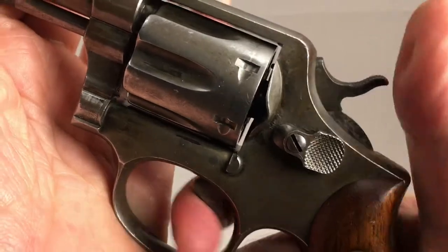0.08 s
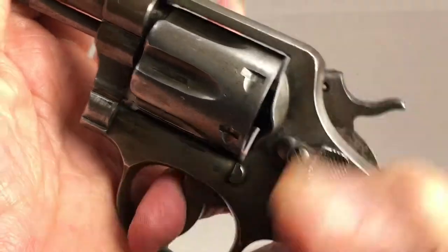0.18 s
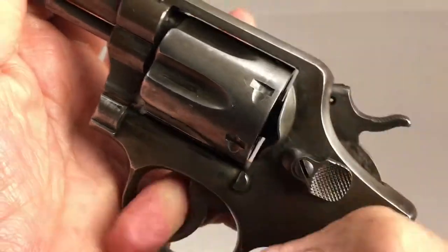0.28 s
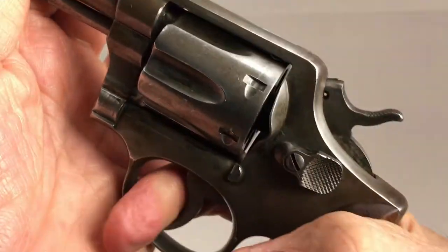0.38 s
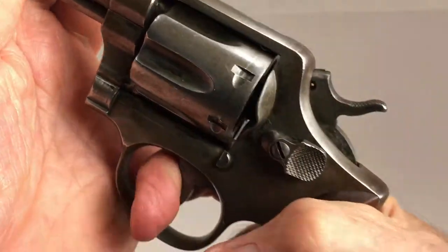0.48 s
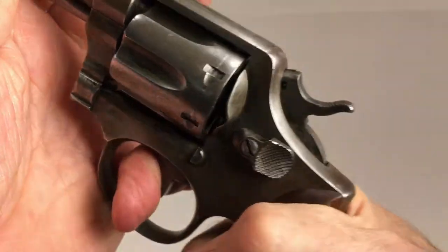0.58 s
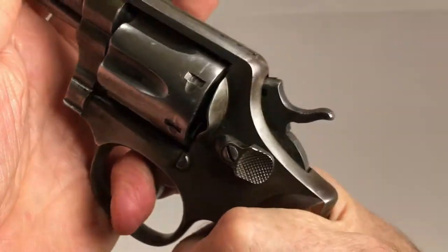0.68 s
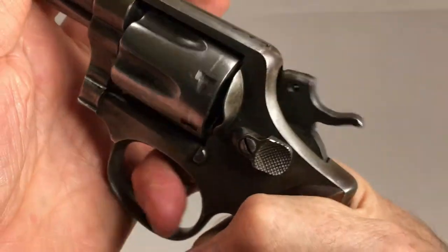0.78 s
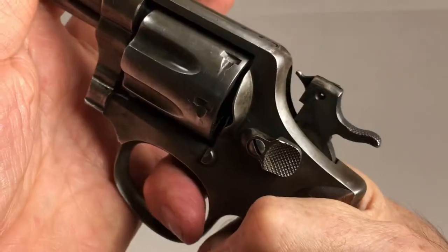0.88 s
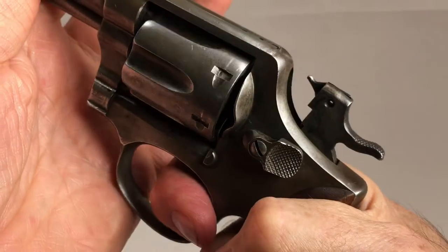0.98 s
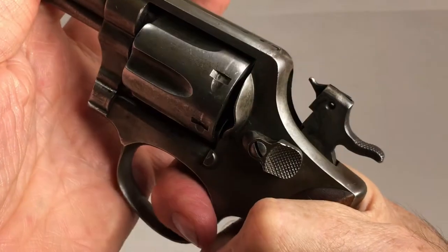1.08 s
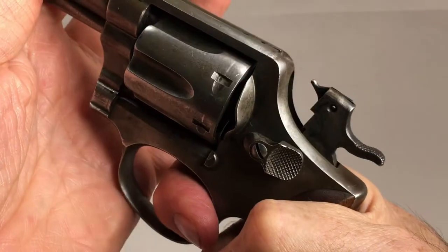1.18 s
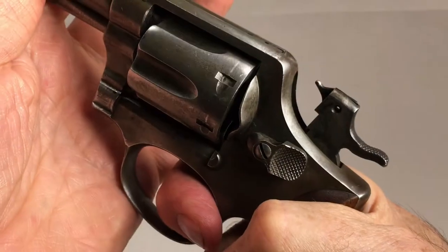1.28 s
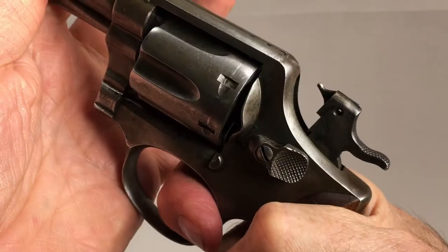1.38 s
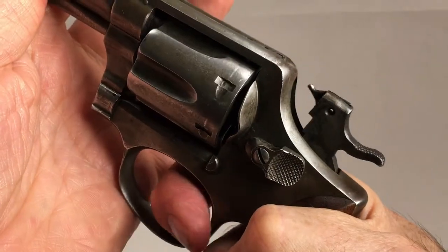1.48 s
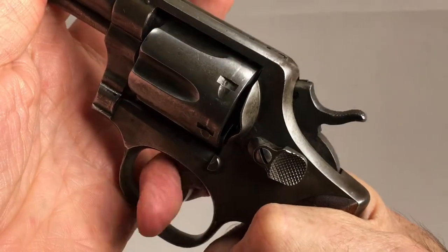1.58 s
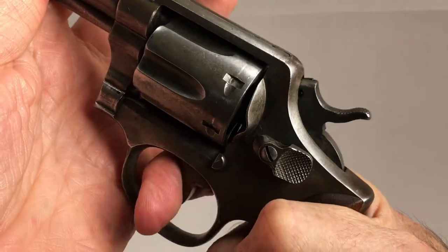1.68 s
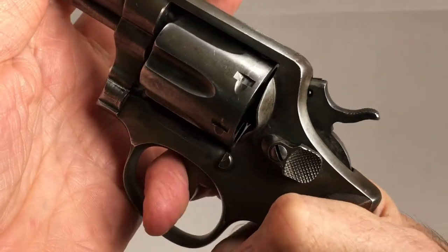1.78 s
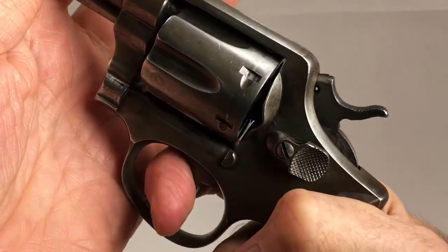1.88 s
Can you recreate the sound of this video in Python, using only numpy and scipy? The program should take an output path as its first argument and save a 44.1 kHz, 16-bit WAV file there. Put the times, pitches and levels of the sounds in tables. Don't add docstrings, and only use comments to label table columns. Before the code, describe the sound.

A revolver is worked by hand close to a small microphone: a light latch click and hard spring snap, then the cylinder stop, the hammer cocking, a pause, and a loud hammer fall in a quiet furnished room.

```python
import sys
import numpy as np
from scipy import signal
from scipy.fft import rfft, irfft
from scipy.io import wavfile

SR = 44100
rng = np.random.default_rng(int(sys.argv[2]) if len(sys.argv) > 2 else 0)


def invert_db(level):
    return 10 ** (np.asarray(level, dtype=float) / 20)


def log_audio(samples):
    frames = np.atleast_2d(samples).T
    limited = np.clip(frames, -1, 1)
    pcm = np.round(limited * 32767).astype(np.int16)
    wavfile.write(sys.argv[1], SR, pcm)


N = 85995


def evened(x):
    return x / np.sqrt(np.mean(x ** 2) + 1e-20)


def read(points, hz):
    point_hz, value = np.transpose(points)
    return np.interp(np.log(hz + 1), np.log(point_hz + 1), value)


def add(mix, start_s, sound):
    part = mix[round(start_s * SR):][:len(sound)]
    part += sound[:len(part)]


def shaped(gain):
    spectrum = rfft(rng.standard_normal(N))
    return evened(irfft(spectrum * gain(np.fft.rfftfreq(N, 1 / SR)), N))


def bunch(hz, width, count):
    return np.repeat(hz, count) + np.repeat(width, count) * rng.uniform(-1, 1, len(hz) * count)


def ring(hz, db, t60, length, rise_s=.0001):
    t = np.arange(length) / SR
    phase = 2 * np.pi * (hz[:, None] * t + rng.random((len(hz), 1)))
    decay = invert_db(db[:, None] - 60 * t / t60[:, None])
    return (decay * np.sin(phase)).sum(0) * np.minimum(t / rise_s, 1)


# pitch_hz, level_db
HUM_SPECTRUM = [(15, -11), (25, 6), (86, -12.5), (123, -3.5), (200, -5), (290, -18), (430, -25),
                (694, -25.5), (1500, -27.5), (1950, -67), (3300, -120)]
# pitch_hz, level_db
HISS_SPECTRUM = [(410, -31.5), (700, -11.5), (1170, -8), (1250, -10), (2240, -10.5), (4860, -13),
                 (12600, -18), (16000, -27.5)]
# start_s, level_db
HISS_GATE = [(0, -2.5), (0.129, -2.5), (.3, -3), (0.669, -4.5), (.72, -10.5), (0.798, -10), (.9, -6),
             (.92, -3.5), (1.199, -4), (1.481, -3.5), (1.488, -14), (1.604, -14), (1.643, 0), (1.7, -5.5),
             (1.95, -3)]
HUM_DB, HISS_DB = -52.5, -60


def floor():
    def hum_gain(hz):
        return invert_db(read(HUM_SPECTRUM, hz)) / (1 + (42 / (hz + 1)) ** 8) / (1 + (hz / 900) ** 6)

    def hiss_gain(hz):
        return invert_db(read(HISS_SPECTRUM, hz)) / (1 + (600 / (hz + 1)) ** 6) * (hz < 15800)

    gate_db = np.interp(np.arange(N) / SR, *np.transpose(HISS_GATE))
    return invert_db(HUM_DB) * shaped(hum_gain) + invert_db(HISS_DB + gate_db) * shaped(hiss_gain)


# pitch_hz, t60_s
ROOM_DECAY = [(1000, 0.36), (2500, 0.31), (5000, 0.35), (9000, 0.22), (15000, 0.074)]


def room(x):
    taps = np.zeros(SR // 2)
    at = np.arange(120, len(taps) - 20, 20)
    taps[at + rng.integers(0, 20, len(at))] = rng.choice([-1., 1.], len(at))
    hz, t, bands = signal.stft(taps, SR, nperseg=128)
    absorbed = bands * invert_db(-60 * t / read(ROOM_DECAY, hz)[:, None])
    tail = signal.istft(absorbed, SR, nperseg=128)[1]
    return signal.fftconvolve(x, tail / np.linalg.norm(tail))[:N]


# start_s, length_s, level_db, pitch_hz, width_hz
RUBS = [
    (.62, .065, -67, 6400, 1300),
    (1.06, .025, -52, 3080, 100),
    (.485, .09, -40.5, 54, 9),
    (.475, .09, -59, 450, 600),
    (1.642, .025, -47, 380, 40),
    (.86, .045, -50, 55, 15),
    (.74, .04, -69, 1500, 600),
]


def rubs():
    out = np.zeros(N)
    for start_s, length_s, level_db, pitch_hz, width_hz in RUBS:
        size = round(length_s * SR)
        noise = shaped(lambda f: np.exp(-((f - pitch_hz) / width_hz) ** 2))
        add(out, start_s, invert_db(level_db) * np.hanning(size) ** .5 * evened(noise[:size]))
    return out


# start_s, peak_db, centre_hz, t60_s
TICKS = [(0.1736, -25.5, 7860, 0.016), (.1782, -29.5, 6800, 0.033), (0.189, -34.5, 4600, 0.04),
         (0.1956, -29, 4980, 0.052), (0.2001, -20.5, 7200, 0.017), (0.7009, -25, 5560, 0.012),
         (.7020, -40.5, 4560, 0.032), (0.799, -48, 2100, .015), (0.8269, -45, 5010, .02),
         (0.8337, -32.5, 6040, 0.018), (0.8327, -38, 2800, 0.047), (0.8483, -36, 8950, 0.012),
         (0.8824, -45, 9170, 0.0093), (1.0090, -43, 6760, 0.023), (1.5117, -54, 8000, .02),
         (1.5665, -44.5, 4915, 0.026), (1.5865, -44.5, 4000, 0.03), (1.622, -48.5, 9800, .03),
         (1.6235, -48.5, 4500, 0.017), (1.6352, -36, 5490, 0.022), (1.6389, -36, 6700, 0.038),
         (1.6412, -36, 8800, 0.022)]


def ticks():
    out = np.zeros(N)
    count, spread_octaves = 60, 1.0
    for start_s, peak_db, centre_hz, t60_s in TICKS:
        hz = 1250 * (16000 / 1250) ** ((np.arange(count) + rng.random(count)) / count)
        octaves = np.log2(hz / centre_hz)
        level = -6 * (octaves / spread_octaves) ** 2 + 3 * rng.standard_normal(count)
        tone = ring(hz, level, t60_s * rng.uniform(0.37, 0.6, count), 2200)
        add(out, start_s, invert_db(peak_db) * tone / np.linalg.norm(invert_db(level)) / 1.3)
    return out


# start_s, level_db, pitch_hz, t60_s
PINGS = [(.1462, -47.5, 2060, .035), (.1895, -37.5, 4550, .025), (.7004, -53, 1000, .025),
         (.7004, -40, 3710, .02), (.7004, -39, 4600, .025), (.2072, -30.5, 1200, 0.021),
         (.8335, -41.5, 2570, .03), (.8335, -48, 4400, .03), (.8335, -59, 3300, .025),
         (.9345, -46, 6100, .03), (1.6235, -51, 4300, .03), (1.6400, -39.5, 3900, .015),
         (1.6620, -30, 5600, .03), (.2075, -29, 690, .02), (1.6480, -41, 800, 0.041),
         (1.6480, -41.5, 1060, 0.06), (.1462, -43.5, 1260, 0.019), (.1462, -42.5, 1750, 0.023),
         (1.0756, -17.5, 6580, .016), (.8335, -52, 1400, .03)]


def pings():
    out = np.zeros(N)
    for start_s, level_db, pitch_hz, t60_s in PINGS:
        add(out, start_s, ring(*np.array([[pitch_hz], [level_db], [t60_s]]), 2500))
    return out


BLOW_TIMES = [
    .2078,
    .9056,
    .9064,
    1.0750,
]
# level_db, corner_hz (above it the push fades)
BLOWS = [
    (-7, 220),
    (-6.5, 1900),
    (-5.5, 650),
    (-3, 2000),
]
# pitch_hz, level_db
BLOW_SPECTRUM = [(24, -28.5), (40, -5.5), (181, -0.5), (2890, -8), (4020, -11.5), (8000, -16),
                 (10400, -43.5), (17600, -120)]


def blows():
    out = np.zeros(N)
    hz = np.fft.rfftfreq(8192, 1 / SR) + 1
    lag_cycles, lag_hz = .72, 106
    lag = np.exp(-2j * np.pi * lag_cycles * np.log(hz / lag_hz))
    for start_s, (level_db, corner_hz) in zip(BLOW_TIMES, BLOWS):
        push = invert_db(read(BLOW_SPECTRUM, hz)) / (1 + (hz / corner_hz) ** 2) / (1 + (42 / hz) ** 8)
        add(out, start_s, invert_db(level_db + 23.5) * irfft(push * lag)[:4000])
    return out


def spike():
    start_s, level_db, pitch_hz = 1.07535, -1.5, 4200
    turns = (np.arange(N) / SR - start_s) * pitch_hz
    return invert_db(level_db) * np.sin(2 * np.pi * turns) * np.exp(-(turns / .45) ** 2)


def snap(hits, part, body, body_db, crack_db, rise_s):
    tones, cracks, shimmer = np.zeros((3, N))
    hz, width, db = np.transpose(part)
    crack_filter = signal.butter(2, [2200, 14000], "band", fs=SR)
    crack_t60, uneven_db = .008, 2.5
    for start_s, peak_db, bright, t60_s in hits:
        t60_s = min(t60_s, .022)
        level = np.repeat(db + bright * np.log2(hz / 5000), 3)
        level = level + uneven_db * rng.standard_normal(len(level))
        decay_s = t60_s * rng.uniform(.7, 1.2, len(level))
        tone = ring(bunch(hz, width / 2, count=3), level, decay_s, 2000, rise_s)
        add(tones, start_s, invert_db(peak_db) * tone / np.linalg.norm(invert_db(db)) / 2.05)
        noise = signal.lfilter(*crack_filter, rng.standard_normal(2000))
        fade_db = -60 * np.arange(2000) / SR / min(t60_s, crack_t60)
        add(cracks, start_s, noise * invert_db(peak_db + crack_db + fade_db))
    hz, width, db, t60 = np.transpose(body)
    level = np.repeat(db, 40) + rng.standard_normal(40 * len(hz))
    glow = ring(bunch(hz, width, count=40), level, np.repeat(t60, 40), 7000)
    strongest_s = max(hits, key=lambda hit: hit[1])[0]
    add(shimmer, strongest_s, invert_db(body_db - 20.5) * glow)
    return tones + cracks + shimmer, .35 * tones + 2 * cracks


# pitch_hz, width_hz, level_db, t60_s
FRAME = [(2800, 800, -5.5, 0.13), (4000, 500, -5.5, 0.18), (4580, 260, -7.5, .2), (5630, 1200, -1, 0.17),
         (8310, 900, -3, .17), (7500, 2200, 0, 0.097), (12300, 3400, 0.5, 0.1)]
# start_s, peak_db, bright_db_per_octave, t60_s
LATCH_HITS = [
    (.1439, -25.5, 4, 0.014),
    (.1460, -18, -3.5, 0.011),
    (.1468, -25, -1, 0.022),
]
# pitch_hz, width_hz, level_db
LATCH = [(2100, 68, -4.5), (3320, 180, -1), (3640, 330, -2), (4440, 140, -11.5), (5550, 400, -4),
         (6400, 700, -7), (7600, 220, -11.5), (8070, 120, -11.5), (9240, 110, -18), (10800, 300, -17),
         (11200, 150, -14), (12800, 400, -18.5)]


def latch(body_db, crack_db, rise_s):
    return snap(LATCH_HITS, LATCH, FRAME, body_db, crack_db, rise_s)


# start_s, peak_db, bright_db_per_octave, t60_s
SPRING_HITS = [
    (.2039, -4.5, 1, 0.044),
    (.2050, -8, -1.5, 0.0058),
    (.2064, 0.5, 0.0095, 0.011),
    (.2076, -1, 0.3, 0.019),
    (.2102, -2, -0.29, 0.0035),
    (.2122, -14, 1, 0.023),
]
# pitch_hz, width_hz, level_db
SPRING = [(2400, 90, -18), (2900, 600, -13), (3320, 110, -7), (3930, 82, 0), (4280, 200, -1), (4495, 74, 0),
          (4980, 27, -11), (5040, 60, -2.5), (6520, 190, -6.5), (7730, 94, -8.5), (8470, 88, -5.5),
          (9360, 130, -7.5), (11330, 140, -13.5), (13340, 660, -10.5)]


def spring(body_db, crack_db, rise_s):
    return snap(SPRING_HITS, SPRING, FRAME, body_db, crack_db, rise_s)


# pitch_hz, width_hz, level_db, t60_s
CYLINDER = [(2990, 300, -17.5, 0.15), (4600, 110, -5, 0.25), (5500, 400, -8.5, .2), (6800, 500, -8, .2),
            (8370, 1000, -2.5, .22), (9000, 1300, -8, .15), (7500, 5000, 0, 0.14), (11400, 500, -8.5, .12),
            (12800, 4300, 1, .1)]
# start_s, peak_db, bright_db_per_octave, t60_s
STOP_HITS = [
    (.9053, -18, 3.8, .008),
    (.9058, -3.5, -3.5, 0.0068),
    (.9070, -5.5, 2.3, 0.013),
    (.9095, -19.5, 1, 0.014),
]
# pitch_hz, width_hz, level_db
STOP = [(2090, 220, -6), (4050, 360, -9.5), (3880, 160, -7), (6120, 170, -3), (7060, 230, -4.5),
        (7100, 130, 2.5), (8380, 170, 2), (9800, 350, -12.5), (10500, 250, -9), (10400, 130, -12),
        (11900, 300, -9), (12500, 180, -10.5)]


def stop(body_db, crack_db, rise_s):
    return snap(STOP_HITS, STOP, CYLINDER, body_db, crack_db, rise_s)


# start_s, peak_db, bright_db_per_octave, t60_s
COCK_HITS = [
    (1.0745, -24, 0, .01),
    (1.0755, -12, -2, .006),
    (1.0764, -16, -1, .009),
    (1.0785, -19, 0, .012),
    (1.0800, -22, -4, .02),
]
# pitch_hz, width_hz, level_db
COCK = [(3660, 94, -10), (4030, 240, 0.5), (4500, 240, -7.5), (5380, 150, -12), (5730, 140, -1),
        (6570, 240, 1), (6980, 82, -3.5), (7600, 99, -8.5), (8800, 130, -4), (9780, 190, -17),
        (11040, 290, 1), (13100, 150, -19.5)]


def cock(body_db, crack_db, rise_s):
    return snap(COCK_HITS, COCK, CYLINDER, body_db, crack_db, rise_s)


# start_s, peak_db, bright_db_per_octave, t60_s
FALL_HITS = [
    (1.6454, -11, 3.5, 0.015),
    (1.6466, -14, -4, 0.01),
    (1.6483, -3, 1, 0.016),
    (1.6503, -1.5, 2, 0.012),
    (1.6516, -10.5, -0.5, 0.021),
    (1.6540, -10, -5, 0.0071),
]
# pitch_hz, width_hz, level_db
FALL = [(3150, 130, -9.5), (3720, 150, -4.5), (4030, 91, -2), (5338, 65, -1), (6100, 230, -1.5),
        (6820, 160, -5), (7960, 250, 0.5), (8800, 97, -5.5), (9300, 110, -5), (10950, 150, -7.5),
        (11260, 100, -7), (11700, 110, -16), (12700, 220, -11.5), (13830, 100, -6.5)]


def fall(body_db, crack_db, rise_s):
    return snap(FALL_HITS, FALL, FRAME, body_db, crack_db, rise_s)


# body_db, room_db, crack_db, rise_s
SENDS = [
    (-48.5, -21, -8, 0.00015),
    (-28.5, -21.5, -8.5, 0.00053),
    (-37, -26.5, -6, 0.00034),
    (-37, -23, -5, 0.000058),
    (-31.5, -21.5, -6, 0.00045),
]


def scene():
    steel = ticks() + pings()
    send = invert_db(-23.5) * steel
    for strike, (body_db, room_db, crack_db, rise_s) in zip([latch, spring, stop, cock, fall], SENDS):
        direct, diffuse = strike(body_db, crack_db, rise_s)
        steel = steel + direct
        send = send + invert_db(room_db) * diffuse
    return (steel + room(send) + spike() + blows() + rubs() + floor())[None]


def roll_off(x):
    return signal.sosfilt(signal.butter(12, 16820, fs=SR, output="sos"), x)


def record(dry):
    lowpass = signal.firwin(255, 16300, window=("kaiser", 8), fs=SR)
    mix = signal.oaconvolve(np.clip(dry, -1, 1), lowpass[None], "same")
    return roll_off(mix)


dry = scene()
out = record(dry)
log_audio(out)
```